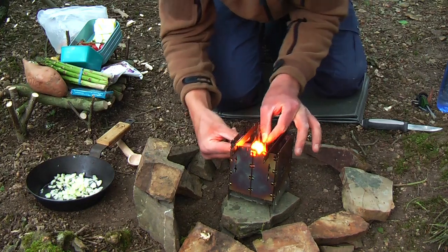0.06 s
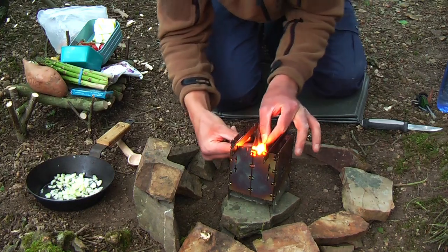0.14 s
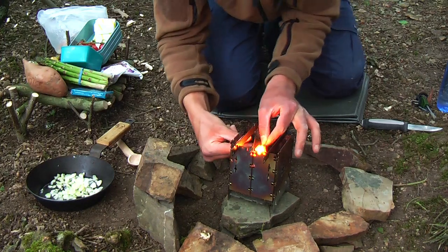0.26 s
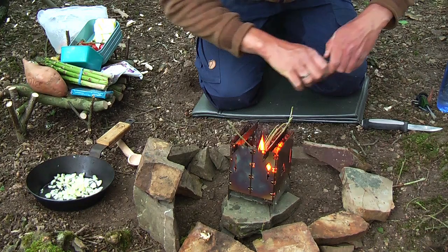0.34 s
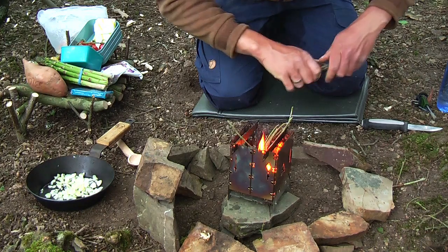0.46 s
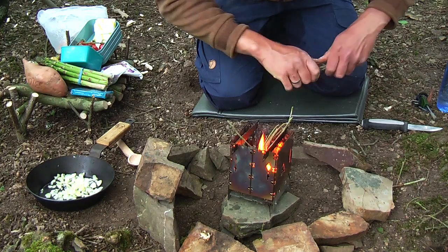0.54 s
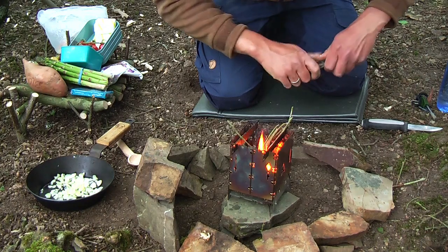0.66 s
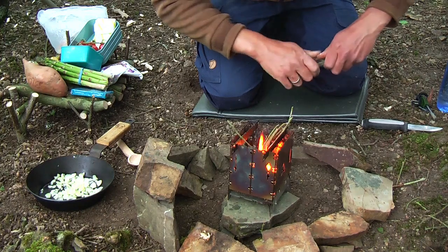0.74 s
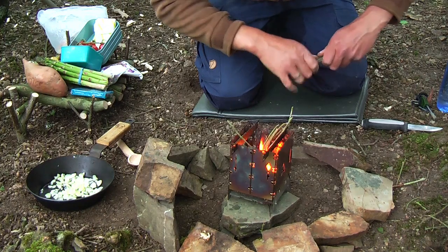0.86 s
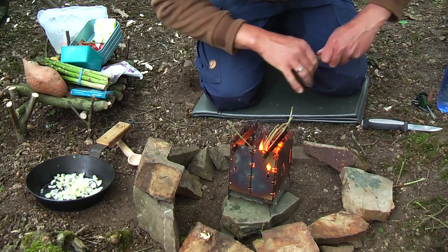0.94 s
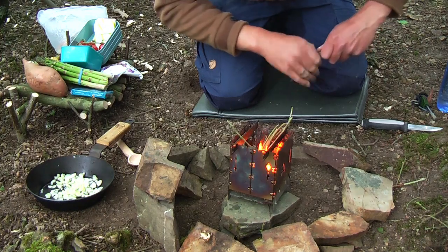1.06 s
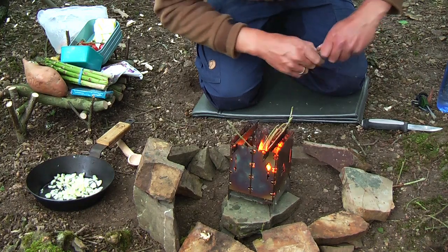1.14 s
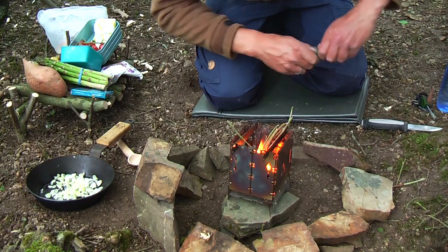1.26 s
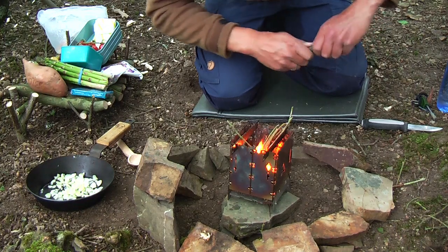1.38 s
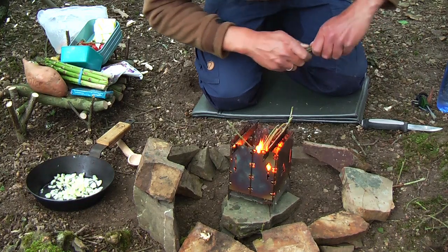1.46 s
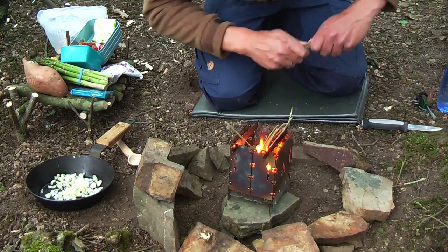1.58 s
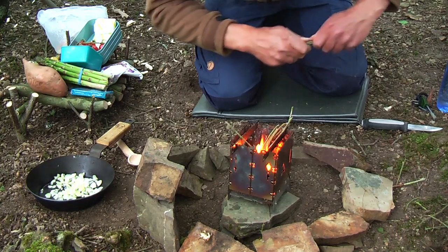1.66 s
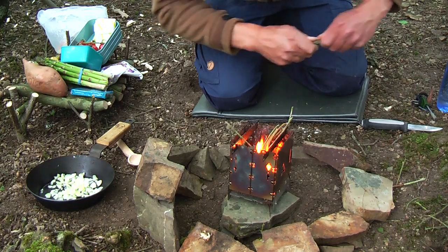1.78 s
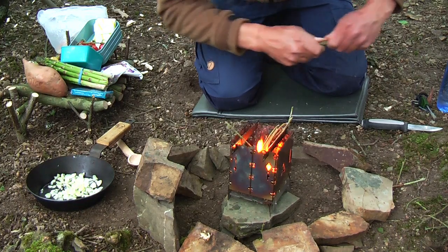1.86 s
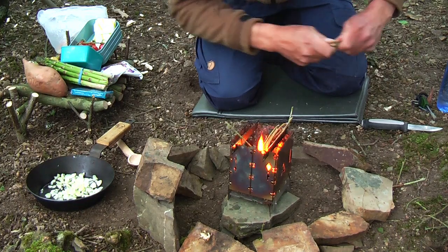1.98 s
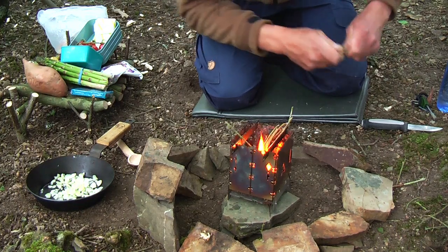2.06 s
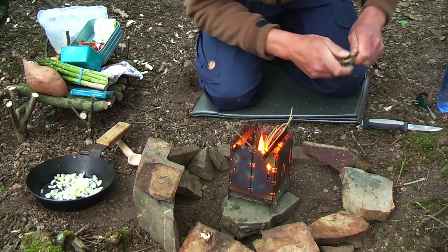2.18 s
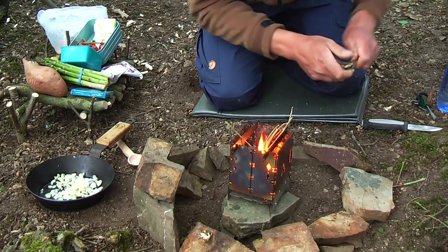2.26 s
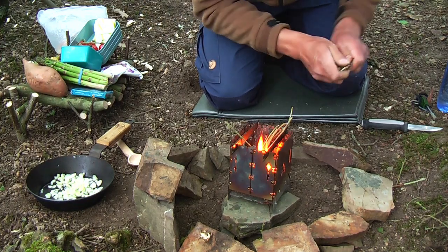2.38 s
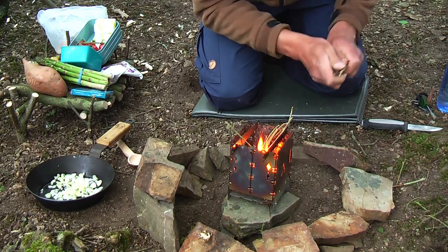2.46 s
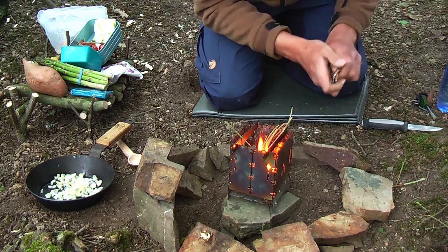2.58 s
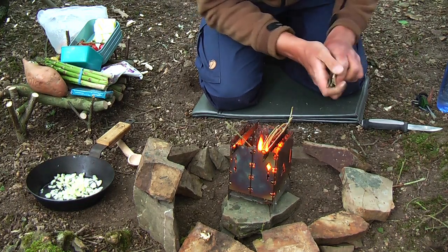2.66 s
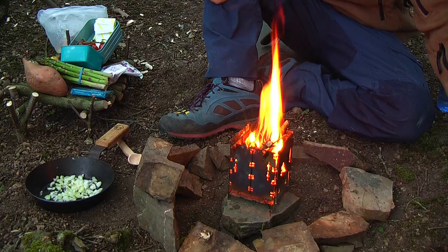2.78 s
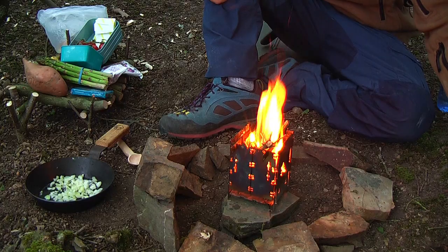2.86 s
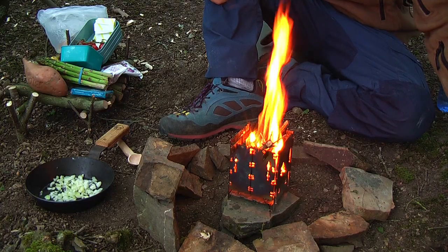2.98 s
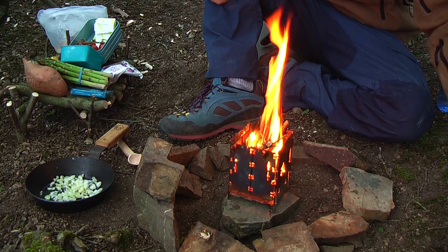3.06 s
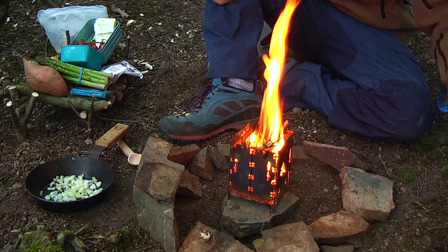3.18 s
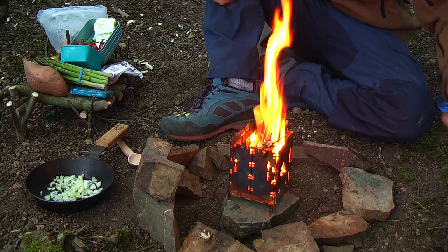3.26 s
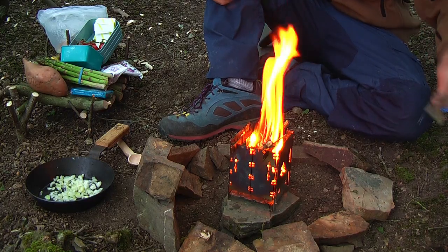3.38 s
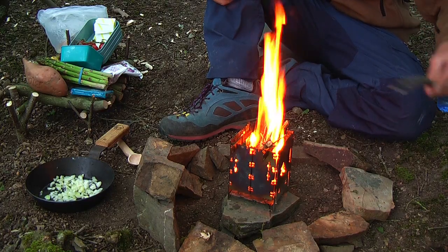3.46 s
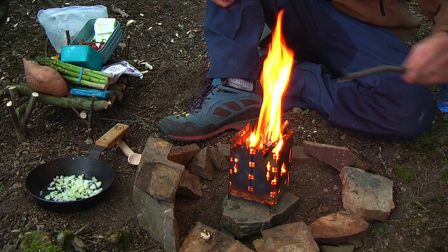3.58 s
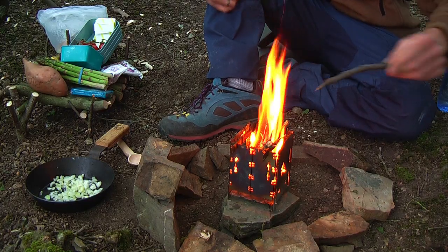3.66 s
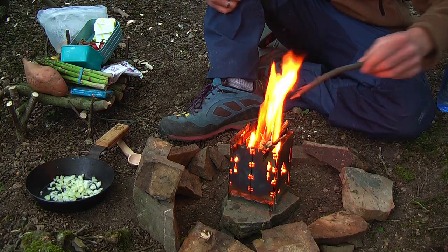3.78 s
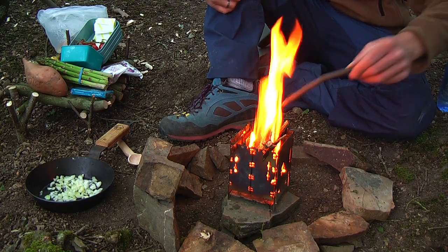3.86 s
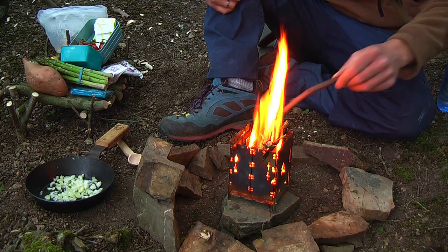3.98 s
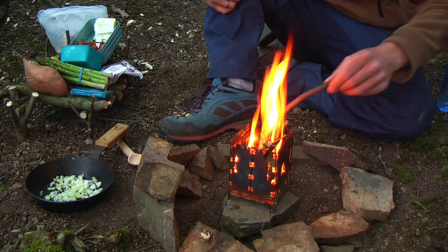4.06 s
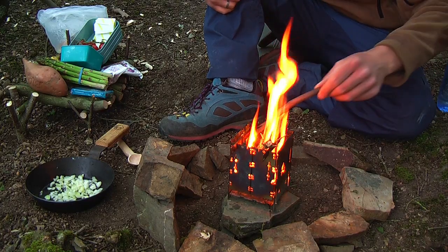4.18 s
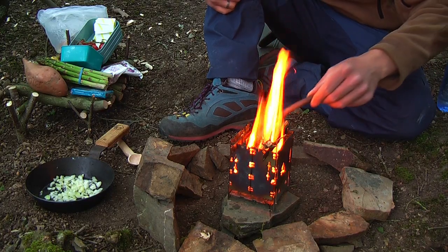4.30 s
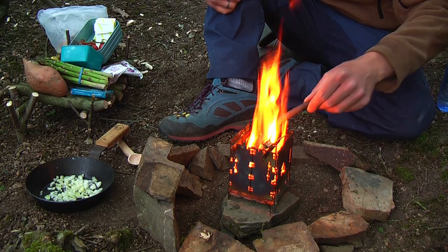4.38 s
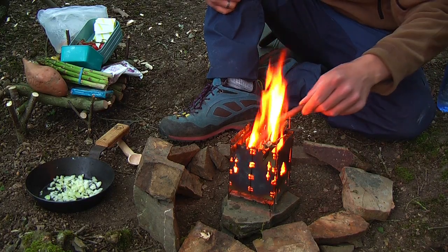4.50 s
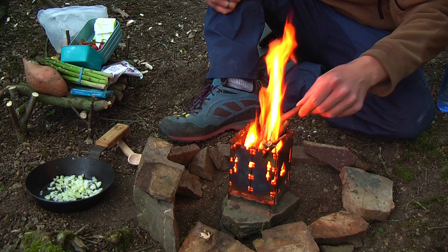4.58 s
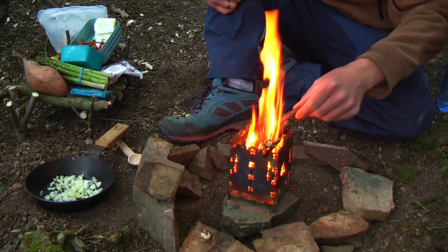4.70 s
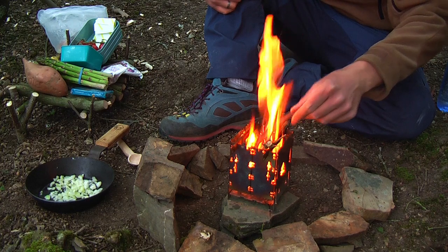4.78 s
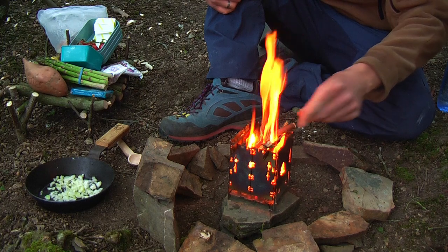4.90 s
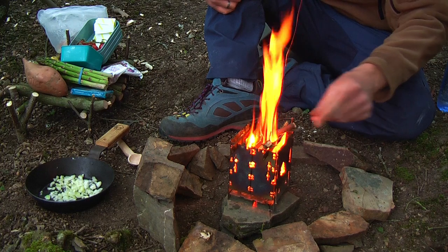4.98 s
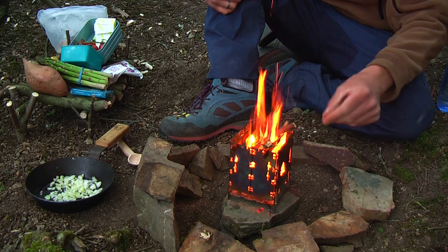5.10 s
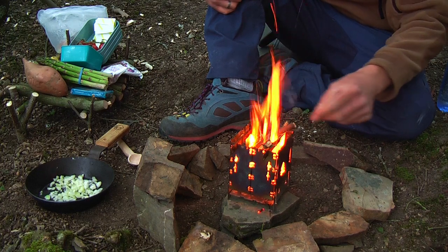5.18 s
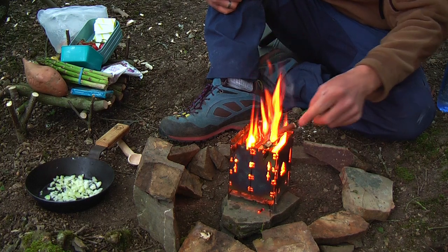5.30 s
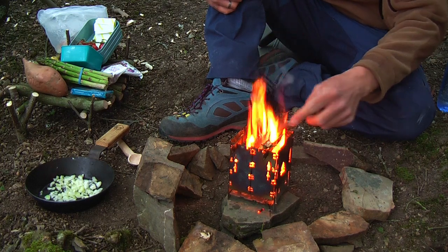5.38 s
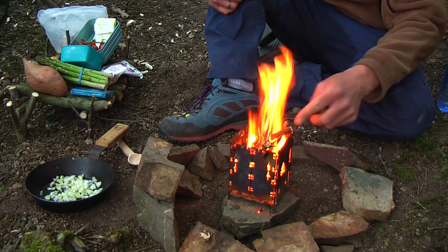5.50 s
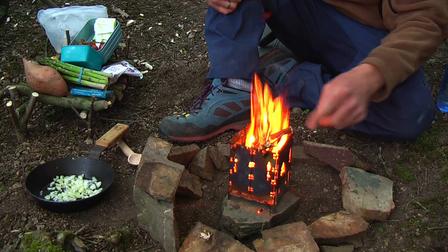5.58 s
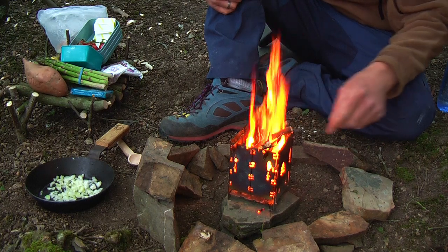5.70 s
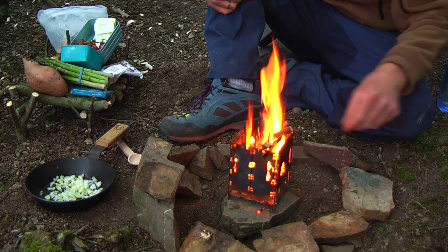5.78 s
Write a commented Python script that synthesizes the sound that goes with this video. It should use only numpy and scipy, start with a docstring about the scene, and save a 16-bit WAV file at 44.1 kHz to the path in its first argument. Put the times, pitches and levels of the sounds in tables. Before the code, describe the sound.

Close microphone outdoors at a small sheet-metal twig stove. Kindling ticks and snaps while clothing rustles; dry twigs break with two violent cracks near two seconds. The background then shifts abruptly, far birds chirp more clearly, and low draught thumps multiply. A pushed stick clatters on the metal with a short ring, and rumble swells towards the end.

```python
"""Twig stove outdoors, close microphone

Close by, kindling crackles in a small sheet-metal stove: noise bursts with a hollow body note for each snap.
Hands snap twigs and push sticks in; gritty noise scrapes the metal and rings its modes. Clothes rustle as hiss.
Flame rumble is low noise; draught thumps push the one microphone. Far off, an engine hums and sine-like birds sing.
Gain control dips after the loudest snaps; at two cuts the background restarts low and fades in."""
import sys
import numpy as np
from scipy import signal
from scipy.io import wavfile
from scipy.ndimage import uniform_filter1d

SR = 44100
rng = np.random.default_rng(int(sys.argv[2]) if len(sys.argv) > 2 else 0)


def wav_out(sig):
    """Save sig, one row per channel (or a flat mono array), as 16-bit PCM at SR to the path in sys.argv[1]."""
    wavfile.write(sys.argv[1], SR, np.round(np.clip(np.atleast_2d(sig).T, -1, 1) * 32767).astype(np.int16))


N = 257544  # samples


def amp(db):
    """Amplitude factor of a level in dB."""
    return 10 ** (np.asarray(db) / 20)


def evened(x):
    """Scales x to an RMS of 1."""
    return x / np.sqrt(np.mean(x ** 2) + 1e-20)


def drift(count, size):
    """Random wandering of RMS 1, smoothed over size samples."""
    return evened(uniform_filter1d(rng.standard_normal(count), size=size))


def read(points, hz):
    """Reads a spectrum at hz, interpolating along log frequency."""
    f, value = np.transpose(points)
    return np.interp(np.log(hz + 1), np.log(f + 1), value)


def add(mix, s, sound):
    """Adds a sound to the mix at s seconds, cut off at the end."""
    part = mix[round(s * SR):][:len(sound)]
    part += sound[:len(part)]


def level(curve):
    """Gain over time from rows (time [s], level [dB])."""
    s, db = np.transpose(curve)
    return amp(np.interp(np.arange(N) / SR, s, db))


def coloured(x, db):
    """Causal minimum-phase filter with gain db at the rfft frequencies of 2048 points."""
    log_gain = np.log(amp(np.maximum(db, -100)))
    mirrored = np.concatenate([log_gain, log_gain[-2:0:-1]])
    full = signal.hilbert(mirrored)  # the phase that belongs to this gain
    response = np.fft.ifft(np.exp(np.conj(full))).real[:1024]
    return signal.oaconvolve(x, response)[:len(x)]


def resonate(x, hz, width):
    """Shifts hz down to zero, smooths, and shifts back: a resonance of gain 1, width in Hz."""
    turn = np.exp(2j * np.pi * np.cumsum(hz * np.ones(len(x))) / SR)
    r = np.exp(-np.pi * width / SR)
    smooth = signal.lfilter([1 - r], [1, -r], x / turn)
    return 2 * (turn * smooth).real


def noise(spectrum, patchy_db, flicker_db, size):
    """Random short-time spectra with drifting patches and a flicker shared by all bins, RMS 1."""
    frames, hz = 4 * N // size + 5, np.fft.rfftfreq(size, 1 / SR)
    real, imaginary, patches = rng.standard_normal((frames, len(hz), 3)).T
    patches = uniform_filter1d(patches, size=9, axis=0)
    patches = evened(uniform_filter1d(patches, size=9, axis=1))
    flicker = rng.standard_normal(frames)
    gain = amp(read(spectrum, hz)[:, None] + patchy_db * patches + flicker_db * flicker)
    z = (real + 1j * imaginary) * gain
    return evened(signal.istft(z, nperseg=size, noverlap=size * 3 // 4)[1][:N])


HUM_HZ = 70.3
HUM_DB, WAVER_DB, WAVER_S = -42, 1.5, .06
# overtones of the distant engine: (multiple of the base pitch, level re base [dB])
HUM_OVERTONES = [(2, -19.5), (5, -29)]


def hum():
    """A distant engine: a steady low note whose level wavers slightly, with faint overtones."""
    turn = 2 * np.pi * HUM_HZ * np.arange(N) / SR
    size = int(WAVER_S * SR)
    waver = evened(uniform_filter1d(drift(N, size), size=size))
    note = np.sin(turn) + sum(amp(db) * np.sin(k * turn) for k, db in HUM_OVERTONES)
    return np.sqrt(2) * amp(HUM_DB + WAVER_DB * waver) * note


# clothes moving near the microphone:
# (start [s], swell [s], fade [s], dull part's top level [dB], bright part's top level [dB])
CLOTH_MOVES = [(0, 0.22, 0.2, -47.5, -52.5), (.39, 0.065, .1, -80, -59.5), (.66, 0.059, 0.51, -76, -67.5),
               (2.021, 0.096, 0.48, -59, -50), (2.42, 0.092, 0.55, -68, -55),
               (2.579, 0.148, 0.012, -50, -45), (2.8, .06, 0.59, -65, -62.5),
               (3.15, 0.035, 0.094, -66.5, -57.5), (3.3, 0.39, .05, -47, -46.5),
               (4.98, 0.14, 0.16, -48.5, -60), (5.2, 0.043, 0.27, -46.5, -55), (5.5, 0.21, 0.94, -41, -54)]


def cloth():
    """Gains of the dull and the bright part of the rustles: each swells, then fades."""
    t, power = np.arange(N) / SR, np.zeros((2, N))
    first_cut = CUTS[0][0]
    for s, swell, fade, *db in CLOTH_MOVES:
        shape = np.interp(t, np.cumsum([s, swell, fade]), [0, 1, 0])
        if s < first_cut:
            shape *= t < first_cut  # ends at the cut
        power += (amp(db)[:, None] * shape) ** 2
    return np.sqrt(power)


FAR_HISS_DB = -61
# spectrum shape of the far hiss and dull cloth: (frequency [Hz], relative density [dB])
HISS_SPECTRUM = [(150, -31), (250, -7), (353, 1), (404, -4), (1140, -6.5), (1360, -3), (1560, -6.5),
                 (2040, -6.5), (3450, -10), (4380, -17.5), (9000, -36), (11700, -28), (19800, -120)]


def hiss(dull):
    """Far hiss and dull cloth share one patchy noise, their powers added."""
    return np.hypot(amp(FAR_HISS_DB) * fade_in(), dull) * noise(HISS_SPECTRUM, 2.2, 0.39, size=1024)


# spectrum shape of the bright cloth rustle: (frequency [Hz], relative density [dB])
RUSTLE_SPECTRUM = [(240, -40.5), (400, -16), (1220, -1), (1400, -13), (1850, -3), (3570, -2.5),
                   (4630, -12.5), (15500, -22)]


def rustle(bright):
    """Bright cloth: noise in short flickering frames."""
    return bright * noise(RUSTLE_SPECTRUM, 1.36, 2.3, size=256)


MIC_HISS_DB = -67.5


def microphone_hiss():
    """The microphone's own white hiss, which fades in after each cut but never above its first level."""
    return amp(MIC_HISS_DB) * rng.standard_normal(N) * np.minimum(fade_in(), 1)


# spectrum shape of the low rumble: (frequency [Hz], relative density [dB])
RUMBLE_SPECTRUM = [(12, -37.5), (20, -19.5), (43, -13), (75, -12.5), (95, -8), (118, -12.5), (217, -23.5),
                   (348, -38), (500, -29.5), (650, -71.5), (1100, -120)]
# low rumble, sinking at first and stronger towards the end, before the fades: (time [s], level [dB])
RUMBLE_LEVEL = [(0, -46.5), (.6, -51.5), (1.9, -54), (2.75, -53.5), (3.3, -51.5), (3.9, -53.5), (4.3, -50),
                (4.75, -52.5), (5.2, -48), (5.84, -44.5)]


def rumble():
    """Low rumble of flame and wind: noise with a strong flicker."""
    return fade_in() * level(RUMBLE_LEVEL) * noise(RUMBLE_SPECTRUM, 0.46, 3.2, size=1024)


def background():
    """Far and microphone hiss, cloth rustle and the low rumble."""
    dull, bright = cloth()
    return hiss(dull) + rustle(bright) + microphone_hiss() + rumble()


# blurred song of far birds, before the fades: (time [s], centre frequency [Hz], level [dB])
FAR_CHORUS = [(0, 3450, -54), (.27, 3480, -62), (.45, 3400, -71.5), (1.45, 3180, -70.5), (1.75, 3600, -66),
              (2.251, 3250, -56), (2.6, 3390, -61.5), (2.95, 3000, -78), (3.3, 3527, -65),
              (3.75, 3305, -58.5), (4.13, 3260, -57.5), (4.33, 3232, -69), (4.5, 3186, -59),
              (4.7, 3050, -60), (4.95, 3150, -63.5), (5.3, 3430, -65), (5.84, 3255, -58)]


def chorus():
    """Birds too far off to resolve: twittering noise through a moving double resonance."""
    s, hz, db = np.transpose(FAR_CHORUS)
    hz, db = (np.interp(np.arange(N) / SR, s, c) for c in (hz, db))
    twitter = amp(3.4 * drift(N, 900))
    song = resonate(rng.standard_normal(N) * twitter, hz, 600)
    song = resonate(song, hz, 600)
    return fade_in() * amp(db) * evened(song)


# spectrum shape of snapping wood, also of the direct scrapes: (frequency [Hz], gain [dB])
SNAP_SPECTRUM = [(71, -64.5), (120, -17), (1870, -8.5), (2110, -9), (3510, -4.5), (4480, -11),
                 (6210, -11.5), (6730, -9), (7610, -12), (9710, -9), (15500, -17.5)]
TEAR_T60_S, BODY_WIDTH_HZ = 0.015, 300
CRACK_DB = 18  # first sample, over the tearing noise before filtering
PUSH_DB, PUSH_S = -19, .0003


def snap(db, body_hz, body_db, bright_db, t60):
    """Fibres part: sharp crack, short tear, hollow body, push of air, faint scatter off stones and stove."""
    t, hz = np.arange(4000) / SR, np.fft.rfftfreq(2048, 1 / SR)
    tear = amp(-60 * t / np.clip(t60, .003, .1))
    scatter = amp(-23.5 - 60 * t / 0.17)
    onset = amp(6 - 60 * t / .002)
    burst = rng.standard_normal(len(t)) * (tear + scatter + onset) + amp(CRACK_DB) * (t == 0)
    tilt = bright_db * np.log2((hz + 1300) / 4800) / 2
    burst = coloured(burst, read(SNAP_SPECTRUM, hz) + tilt)
    burst += amp(body_db) * resonate(burst, body_hz, BODY_WIDTH_HZ)
    u = t / PUSH_S
    push = amp(PUSH_DB) * u * (2 - u) * np.exp(-u)
    return amp(db) * (burst / abs(burst).max() + push)


# wood snaps close by: (time [s], burst peak before gain control [dB], body pitch [Hz],
# body resonance gain [dB], treble tilt [dB per two octaves of frequency + 1300 Hz])
WOOD_SNAPS = [(0.234, -26, 3430, 15.5, -5), (0.405, -33, 3200, 14, 7), (0.45, -24, 1830, 9, 7.5),
              (0.51, -29.5, 3450, -4, -4.5), (0.593, -34.5, 2090, 4, 2), (0.659, -27.5, 1360, 3, -12),
              (0.74, -35.5, 3000, -5, 4), (0.768, -39, 3010, -5, 3), (0.831, -38, 3200, 15, -8),
              (0.878, -28, 3430, -1, 2.5), (0.885, -24, 3430, 7, 14.5), (0.996, -36.5, 3560, 13, -9),
              (1.058, -22.5, 2200, 16, -11), (1.067, -22.5, 2270, 0, 16), (1.259, -35, 3000, -8, 6),
              (1.275, -15.5, 2780, -2, 13.5), (1.329, -40, 3000, -10, 12), (1.395, -39, 3150, -8, 1),
              (1.462, -34, 2210, 12, -3), (1.492, -40.5, 2080, 1, -10), (1.553, -25, 2250, 11, -10.5),
              (1.617, -13.5, 3500, -19, 2), (1.627, -31, 1840, 24, -6), (1.637, -27, 3210, -3, 5.5),
              (1.656, -25.5, 3540, -7, 10), (1.676, -24.5, 1790, 20, -17), (1.747, -19.5, 2660, -2, 2),
              (1.782, -32, 1120, 4, 6), (1.854, -27, 1030, 16, 4), (1.8914, 7, 3300, -1, -2),
              (1.893, 1.5, 3670, 10, 7), (1.8991, 2, 1890, -10, 9), (1.903, -6, 1950, -11.5, 10.5),
              (1.9057, 4, 2860, -13, 9.5), (1.9304, -5, 3300, -1, 13), (1.97, -7.5, 3500, 5, 7),
              (2.084, -24.5, 1980, 11, 9), (2.136, -21.5, 3400, -22, 2), (2.255, -17, 2730, 18, 26),
              (2.374, -19, 3040, 11, 8.5), (2.4158, 9, 3120, -5.5, 12), (2.417, 7.5, 2700, 4, 8),
              (2.474, -22.5, 1430, -6, -11), (2.595, -29.5, 2700, 0, -12.5), (2.61, -31, 3220, -11, -6),
              (2.799, -27, 3430, 7, 3), (2.854, -30.5, 915, -6, -25), (2.888, -29.5, 1410, -2, -19.5),
              (3.171, -33, 1170, 18.5, -6.5), (3.19, -32.5, 1530, -5, 0), (3.238, -26.5, 1440, 12, -14),
              (3.442, -16.5, 1220, 6.5, -3), (3.564, -33, 1780, -3, -1), (3.819, -17.5, 3260, -5, -13),
              (3.991, -21.5, 3490, -13, 8), (4.318, -23.5, 2390, -3, -9), (4.671, -14, 2060, 7, -4),
              (4.777, -29.5, 3240, -14, -4), (4.897, -14.5, 3420, 20, 11), (4.979, -27, 3240, 12, 2),
              (5.219, -30, 1280, 20, -13), (5.541, -24, 1300, 6, -14), (5.606, -23.5, 3100, 13, -15),
              (5.805, -10.5, 2700, -11, 0.5)]


def crackle():
    """The clear snaps, and tiny random ticks, as of twigs twisted by hand."""
    out = np.zeros(N)
    for s, *row in WOOD_SNAPS:
        add(out, s, snap(*row, TEAR_T60_S))
    sizes = amp(3 * np.minimum(rng.exponential(1, N), 4))
    ticks = sizes * (rng.random(N) < 22 / SR)  # about 22 a second
    return out + signal.oaconvolve(ticks, snap(-53, 3000, -6, 8, .006))[:N]


# cuts where the background restarts low and fades in:
# (time [s], start of the fade re its end [dB], end of the fade re the opening [dB])
CUTS = [(0.295, -13, 0), (2.735, -16, 5.5)]
FADE_S = 0.1


def fade_in():
    """Gain of hum, hisses, rumble and chorus: at each cut it restarts low and fades in to a new level."""
    t, gain = np.arange(N) / SR, np.ones(N)
    for s, drop_db, after_db in CUTS:
        fade_db = drop_db * np.clip(1 - (t - s) / FADE_S, 0, 1)
        gain = np.where(t < s, gain, amp(after_db + fade_db))
    return gain


# separate far bird notes, before flutter and echo:
# (time [s], length [s], first pitch [Hz], middle pitch [Hz], last pitch [Hz], level [dB])
BIRD_NOTES = [(.66, .14, 1980, 2020, 2120, -70), (.80, .07, 3700, 4150, 3500, -66),
              (.96, .08, 3550, 4100, 3500, -67), (1.11, .11, 2900, 3120, 3300, -66),
              (1.53, .09, 3500, 3600, 3650, -65), (1.53, .2, 2900, 3150, 3350, -68),
              (1.64, .12, 3650, 3800, 3900, -66), (2.74, .16, 2280, 2250, 2150, -64),
              (2.92, .07, 2800, 2780, 2700, -65), (2.92, .10, 4300, 4500, 4750, -73),
              (3.01, .07, 2230, 2240, 2250, -63), (3.12, .08, 4250, 4220, 4300, -71),
              (3.02, .028, 4700, 4350, 3950, -64), (3.045, .035, 3050, 3560, 3700, -53),
              (3.21, .025, 3240, 3550, 3720, -52), (3.28, .03, 3650, 3600, 3500, -59),
              (3.36, .05, 3500, 3620, 3620, -57), (3.38, .06, 2150, 2100, 2060, -62),
              (3.51, .05, 3600, 3650, 3620, -59), (3.74, .06, 3500, 3500, 3450, -57),
              (3.85, .07, 3480, 3480, 3450, -57), (4.0, .16, 2200, 2180, 2180, -69),
              (4.13, .05, 3300, 3320, 3300, -57), (4.22, .02, 3600, 3450, 3300, -57),
              (4.26, .06, 2250, 2250, 2280, -63), (4.29, .02, 3400, 3250, 3000, -57),
              (4.31, .265, 2400, 2500, 2500, -57), (4.48, .025, 3400, 3550, 3700, -57),
              (4.6, .1, 2050, 2050, 2060, -61)]


def birds():
    """Far notes: fluttering near-sines on curved pitches, smeared by echoes among the trees."""
    out = np.zeros(N)
    for s, length, first_hz, middle_hz, last_hz, db in BIRD_NOTES:
        u = np.arange(0, 1, 1 / (length * SR))
        curve = np.polyfit([0, .5, 1], [first_hz, middle_hz, last_hz], deg=2)
        flutter = 1 + .55 * drift(len(u), 500)
        hz = np.polyval(curve, u) * (1 + .006 * drift(len(u), 200))
        note = np.sin(2 * np.pi * np.cumsum(hz) / SR) * signal.windows.tukey(len(u), .3)
        add(out, s, np.sqrt(2) * amp(db) * flutter * note)
    echoes = rng.standard_normal(12000) * amp(-60 * np.arange(12000) / SR / .4)
    return out + amp(-2.0) * signal.oaconvolve(out, echoes / np.linalg.norm(echoes))[:N]


# draught thumps on the microphone: (time [s], level before shaping [dB], pitch scale [Hz])
DRAUGHT_THUMPS = [(0.759, -32.5, 102), (2.851, -31.5, 145), (2.925, -37, 130), (3.256, -31.5, 157),
                  (3.389, -25, 125), (4.132, -26, 101), (4.293, -30.5, 147), (4.407, -30, 130.2),
                  (4.595, -27, 199), (4.667, -35.5, 171), (4.813, -30, 99), (5.03, -35.5, 102),
                  (5.078, -43, 306), (5.124, -26, 137), (5.203, -24.5, 102), (5.265, -33, 145),
                  (5.322, -23, 106), (5.332, -17.5, 103), (5.407, -28.5, 103), (5.535, -33, 152),
                  (5.589, -26, 119), (5.64, -32, 104), (5.751, -23, 98), (5.819, -29, 101)]


def thumps():
    """Each gust pushes the diaphragm inwards for about one cycle."""
    out = np.zeros(N)
    for s, db, hz in DRAUGHT_THUMPS:
        turns = np.arange(2000) / SR * hz
        # the power below 1 lets the pitch fall
        push = np.sin(2 * np.pi * turns ** 0.81) * np.exp(-(turns / 0.71) ** 2)
        add(out, s, -amp(db) * push * np.minimum(turns / 0.19, 1))
    return out


# a stick knocks and scrapes the stove: (time [s], driving level [dB], decay constant [s])
STICK_KNOCKS = [(4.825, -23, 0.04), (4.837, -18.5, 0.013), (4.859, -19, 0.0081), (4.865, -15, 0.01),
                (4.895, -35, 0.031), (5.015, -43.5, 0.0072), (5.357, -36.5, 0.0087), (5.4, -34, 0.013),
                (5.483, -18, 0.016), (5.508, -28, 0.023), (5.517, -28, 0.021), (5.538, -42, 0.0096),
                (5.607, -38, 0.0092)]
# modes of the sheet metal: (frequency [Hz], relative gain [dB], ring length [s])
# gain also grows with the root of ring length; the middle mode falls 60 dB in about 4/3 of it
STOVE_MODES = [(367, -6, 0.14), (578, 0.5, 0.076), (662, 0, 0.063), (1280, 0, 0.012), (2090, -1.5, 0.26),
               (2700, -2, 0.35), (2916, 5.5, 0.34), (2860, -3.5, 0.7), (3060, -6, 0.069), (3365, 6.5, 0.43),
               (3630, -3, 0.47), (5400, -28, 0.19), (5600, -2, 0.22), (7200, -10, 0.79), (7200, -5, 0.33),
               (8250, 0.5, 0.18), (9700, -19, 0.15), (9350, -21, 0.25), (11900, -26, .17),
               (11910, 3.5, 0.11), (12400, -18, .12)]


def stove():
    """Gritty scrapes are heard directly and drive sheet metal, whose loose panels split each mode in three."""
    drive, t = np.zeros(N), np.arange(6000) / SR
    for s, db, length in STICK_KNOCKS:
        grit = rng.standard_normal(len(t)) * amp(3.5 * drift(len(t), 40))
        shape = np.minimum(t / 0.004, 1) * np.exp(-t / max(length, .002))
        add(drive, s, amp(db) * grit * shape)
    ring = np.zeros(N)
    for hz, db, ring_s in STOVE_MODES:
        for split in (.975, 1, 1.03):
            width = 1.65 / ring_s * (1 + 60 * abs(split - 1))  # the outer two die sooner
            ring += amp(db) * np.sqrt(ring_s) * resonate(drive, hz * split, width)
    direct = coloured(drive, read(SNAP_SPECTRUM, np.fft.rfftfreq(2048, 1 / SR)))
    # the many small modes blend into a short clattering tail
    clatter = rng.standard_normal(len(t)) * amp(-60 * t / 0.25)
    tail = signal.oaconvolve(direct, clatter / np.linalg.norm(clatter))[:N]
    return amp(7.5) * ring + amp(-6.5) * direct + amp(-8.5) * tail


# gain control: starts above this level, deepest dip, time to react, fall, hold and recover
DUCK_FROM_DB, DUCK_DB = -14, -6
DUCK_LAG_S, DUCK_FALL_S, DUCK_HOLD_S, DUCK_BACK_S = .025, .04, 0.094, .13


def duck(x):
    """Gain control: each loud moment pulls the gain down, holds it and lets it recover."""
    t, dip = np.arange(N) / SR, np.zeros(N)
    power = uniform_filter1d((x ** 2).mean(0), size=88)  # over 2 ms
    power_db = 10 * np.log10(abs(power) + 1e-12)[::44]  # looked at about every 1 ms
    times = np.cumsum([DUCK_LAG_S, DUCK_FALL_S, DUCK_HOLD_S, DUCK_BACK_S])
    for k in np.flatnonzero(power_db > DUCK_FROM_DB):
        strength = min((power_db[k] - DUCK_FROM_DB) / 3, 1)  # full dip 3 dB above the start
        dip = np.maximum(dip, strength * np.interp(t - t[44 * k], times, [0, 1, 1, 0]))
    return x * amp(DUCK_DB * dip)


def scene():
    """All sources at the microphone, as two nearly equal channels."""
    mono = fade_in() * hum() + background() + crackle() + stove() + thumps() + birds() + chorus()
    # the channels differ very faintly, mostly in the treble
    apart = amp(-47.5) * np.roll(np.diff(mono, prepend=0), 40)
    return np.array([mono + apart, mono - apart])


EDGE_HZ = 15900


def record(dry):
    """Gain control dips after the loudest snaps, peaks clip, then the treble ends at the band limit."""
    clipped = np.clip(duck(dry), -.9, .9)
    lowpass = signal.firwin(511, EDGE_HZ, window=("kaiser", 9), fs=SR)
    return signal.oaconvolve(clipped, lowpass[None], "same")


dry = scene()
out = record(dry)
wav_out(out)
```